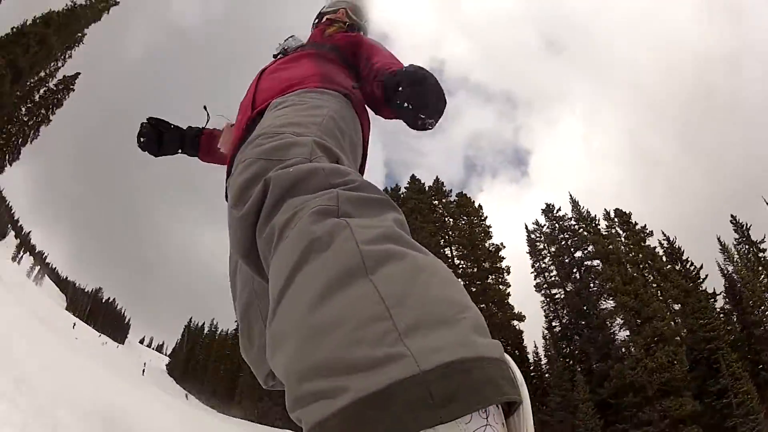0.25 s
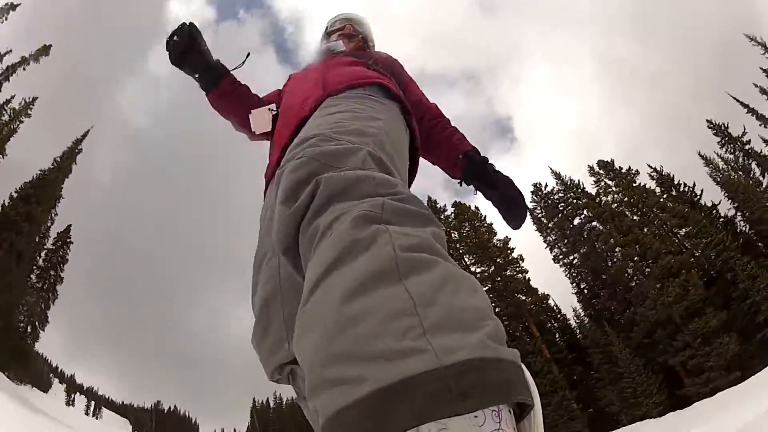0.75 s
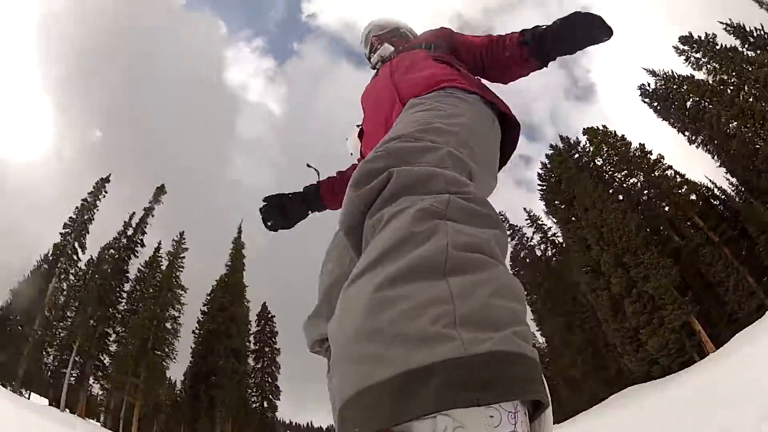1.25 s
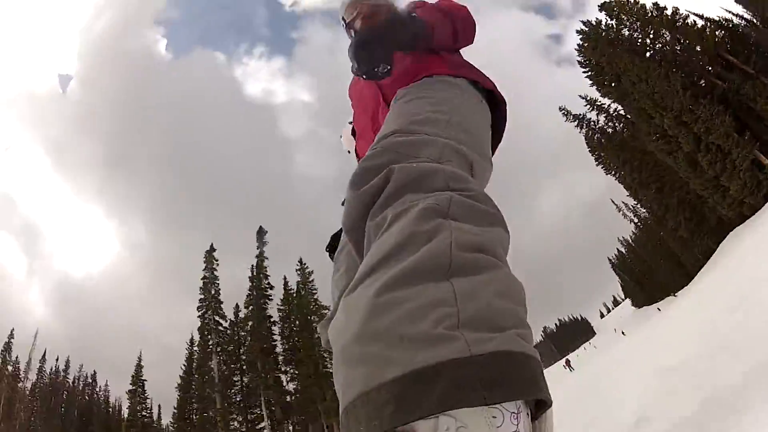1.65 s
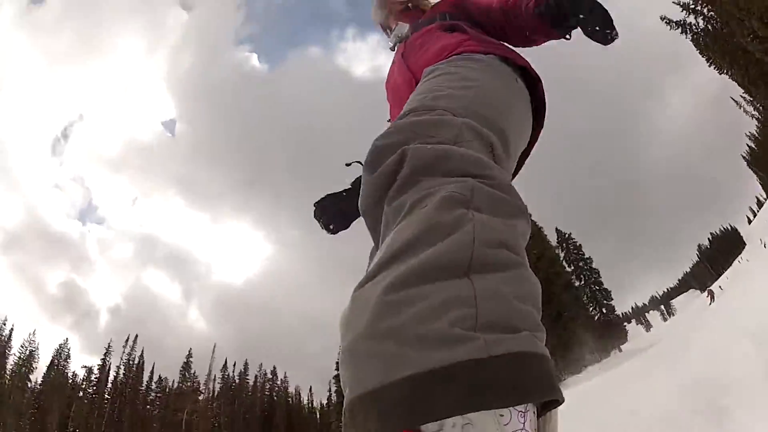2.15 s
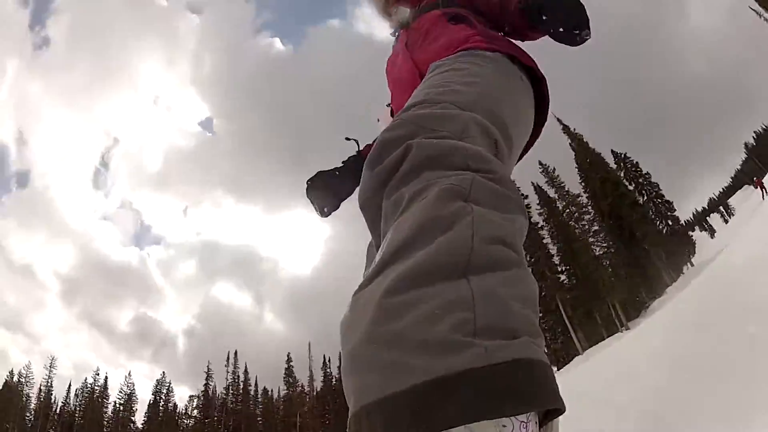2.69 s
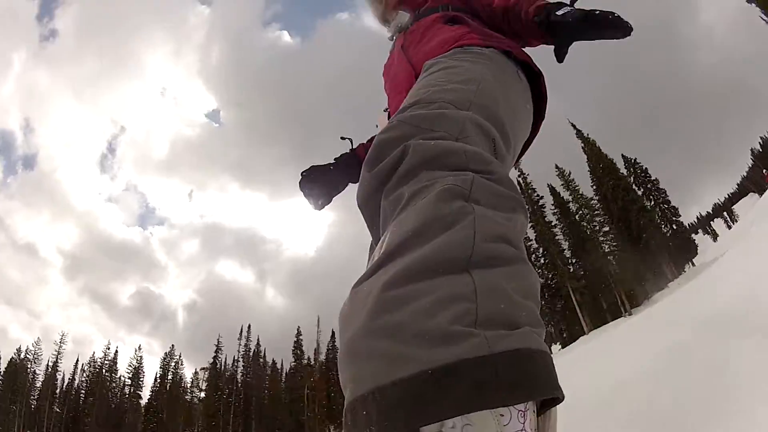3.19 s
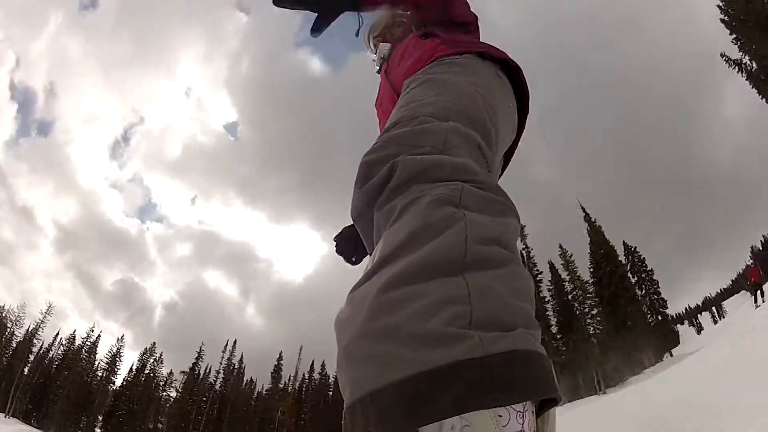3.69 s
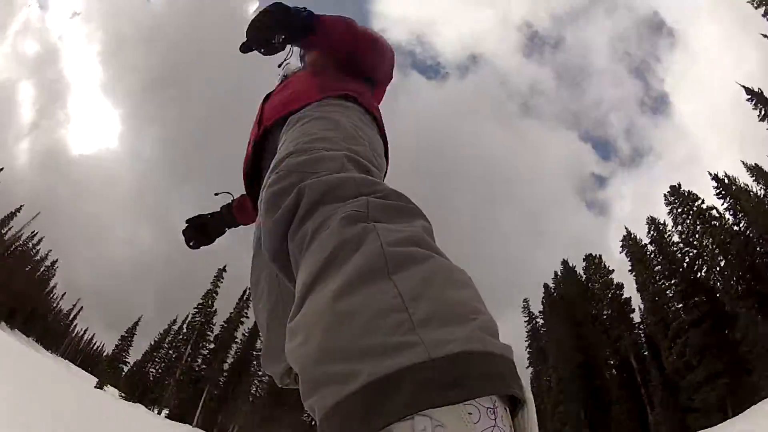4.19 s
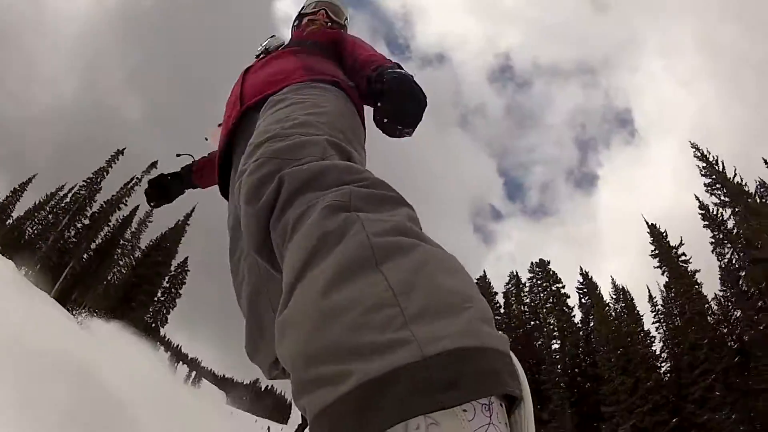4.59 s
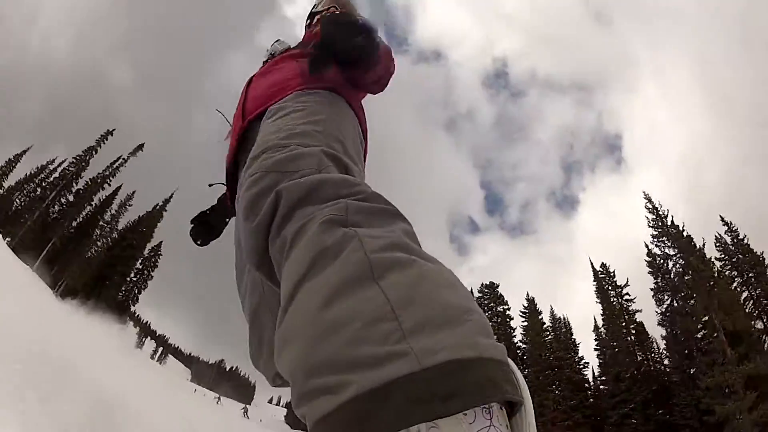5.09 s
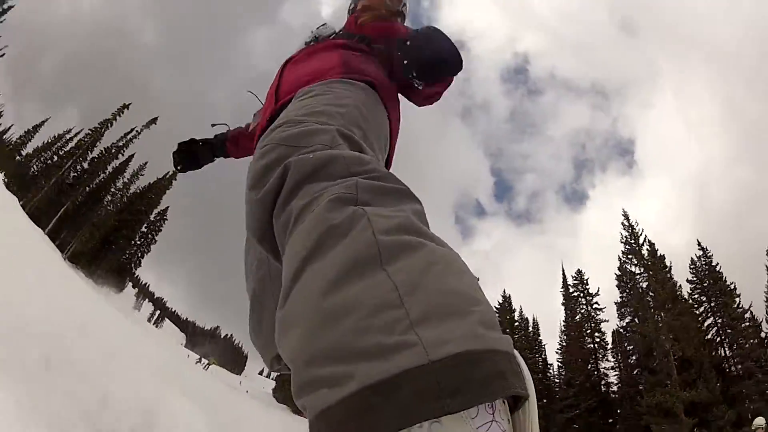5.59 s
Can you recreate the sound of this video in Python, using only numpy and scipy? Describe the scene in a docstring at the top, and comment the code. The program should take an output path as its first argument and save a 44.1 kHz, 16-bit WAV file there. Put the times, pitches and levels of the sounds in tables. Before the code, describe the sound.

A snowboard carves hard snow, heard from a small camera fixed on the deck. A harsh, gritty mid-pitched scrape runs throughout, fluttering in fast surges and dropping for brief moments. Below it the deck shudders in swells. From just before one second, dull thuds and short icy crunches come irregularly. Low wind buffets the housing; the sound is close, dry and slightly clipped.

```python
"""Snowboard carving packed snow

Heard from a small camera in a housing mounted on the deck. Random crystal impacts and hiss, surging
as snow shears, ring the housing and mount: louder as the edge digs in, with brief dips in level.
Noise shudders the board's modes, shaped noise buffets the housing, decaying sines thud as bumps, and
short noisy bursts crunch as ice lumps, with bright ticks. The camera ducks and clips the hardest
blows and holds each sample, which adds a glassy sizzle.
"""
import sys
import numpy as np
from scipy import signal
from scipy.fft import rfft, irfft, next_fast_len
from scipy.io import wavfile
from scipy.ndimage import map_coordinates

SR = 44100
rng = np.random.default_rng(int(sys.argv[2]) if len(sys.argv) > 2 else 0)


def dump(signal):
    """Clip the signal to [-1, 1] and save it as 16-bit WAV at the path in sys.argv[1]."""
    limited = np.clip(np.atleast_2d(signal).T, -1, 1)
    pcm = np.round(limited * 32767).astype(np.int16)
    wavfile.write(sys.argv[1], SR, pcm)


N = 257984

# Levels are relative unless a reference is given; width_hz is the full width at half amplitude.
# rider's pressure on the edge: time_s, level_db
PRESSURE = [(0.0, -17.5), (0.08, -14.5), (0.61, -20.5), (1.07, -18.5), (1.65, -18.5), (2.1, -19.5),
            (2.44, -15.5), (2.8, -18.9), (3.03, -13), (3.16, -19), (3.85, -16.5), (4.08, -19),
            (4.52, -19.5), (4.76, -18.5), (5.06, -21), (5.26, -14.5), (5.53, -21), (5.85, -16.5)]
# edge digs in until the snow gives way: give_s, length_s, rise_db
DIGS = [(0.472, 0.14, 4), (0.759, 0.068, 4.5), (1.057, 0.024, 5), (1.219, 0.025, 4.5), (1.262, 0.011, 8.5),
        (1.456, 0.035, 10), (1.605, 0.031, 5.5), (1.685, 0.065, 4.5), (1.811, 0.089, 4),
        (2.058, 0.028, 6.5), (2.124, 0.075, 4.5), (2.383, 0.027, 8), (3.587, 0.064, 2.5),
        (3.951, 0.095, 4.5), (4.355, 0.015, 7), (4.526, 0.066, 8), (4.571, 0.054, 8), (4.743, 0.022, 6.5),
        (4.928, 0.054, 2), (5.032, 0.023, 3), (5.43, 0.038, 5.5)]
# brief dips in the grinding: start_s, length_s (both at half drop), drop_db (the shortest fall short of it)
DIPS = [(0.517, 0.089, 6.5), (0.934, 0.11, 5), (1.06, 0.1, 5.5), (1.266, 0.017, 2), (1.368, 0.061, 1.5),
        (1.455, 0.047, 8.5), (2.796, 0.032, 4), (2.864, 0.012, 11), (3.17, 0.134, 4), (3.411, 0.061, 3.5),
        (3.599, 0.105, 3.5), (4.029, 0.25, 7.5), (4.366, 0.054, 9), (4.743, 0.097, 8.5), (4.927, 0.081, 9),
        (5.481, 0.11, 6), (5.808, 0.01, 11)]
# fine grit thrown by the tilted edge: time_s, level_db (against the main ring)
GRIT = [(0, -19), (0.85, -14.5), (1.8, -19), (2.4, -17.5), (3.05, -15.5), (3.55, -18), (4.1, -16),
        (4.6, -17), (5.2, -16), (5.85, -18.5)]
# flat base smearing over the snow: time_s, level_db (against the main ring)
SMEAR = [(0, -17), (0.5, -13.5), (1.0, -15.5), (1.5, -11), (2.1, -8), (2.6, -9.5), (3.05, -17.5),
         (3.4, -11.5), (4.1, -14.5), (4.6, -11), (5.85, -12)]
# ground roughness as deck shaking: time_s, level_db
SHAKE = [(0.0, -25), (0.36, -21), (0.75, -12), (1.18, -17), (1.3, -13), (2.13, -9.5), (2.71, -19.0),
         (2.91, -14.4), (3.09, -26.5), (3.33, -12), (3.56, -21.5), (3.94, -10.5), (4.04, -24), (4.31, -8.5),
         (4.56, -17.5), (4.89, -11.5), (5.0, -26), (5.11, -13.5), (5.4, -20), (5.8, -10)]
# wind on the housing: time_s, level_db
GUSTS = [(0, -20.5), (0.2, -38), (0.6, -18.5), (1.05, -19), (1.17, -29), (1.55, -17), (1.8, -30),
         (2.3, -26), (2.6, -40), (2.9, -31), (3.12, -43), (3.33, -26), (3.6, -41), (4.35, -16.5),
         (4.6, -36), (4.8, -25), (5.3, -32.5), (5.78, -19)]
# wind spectrum: pitch_hz, density_db (per Hz)
WIND_SPECTRUM = [(8, -20), (20, -8), (33, -8), (52, -14), (70, -5.5), (150, -16), (400, -45.5), (1500, -66),
                 (4000, -120)]
# bumps striking the board: start_s, level_db, pitch_hz, t60_s
BUMPS = [(0.698, -1.5, 106, 0.16), (0.884, 0.5, 45, 0.17), (0.92, -5, 126, 0.056),
         (1.019, -3.5, 149, 0.095), (1.055, 3.5, 123.6, 0.1), (1.217, -4, 111, 0.027),
         (1.345, -0.5, 153, 0.31), (1.447, 3.5, 124, 0.067), (1.604, 0, 184, 0.071),
         (1.692, -4, 75.4, 0.097), (1.924, 0, 80.6, 0.063), (2.074, 1, 188, 0.026),
         (2.215, -3.5, 147, 0.12), (2.247, 8.5, 148, 0.073), (3.235, -7.5, 148, 0.069),
         (3.351, -1, 61.9, 0.055), (3.382, -1.5, 166, 0.068), (3.886, -0.5, 139, 0.062),
         (3.973, -1.5, 152, 0.02), (4.096, 0, 127, 0.042), (4.152, -7.5, 133, 0.17), (4.261, 0, 67, 0.038),
         (4.296, -5, 138, 0.06), (4.46, -2, 180.3, 0.14), (4.492, -1.5, 78, 0.053),
         (5.399, -3.5, 122, 0.055), (5.645, -6.5, 171.7, 0.12), (5.771, -2, 69.7, 0.13)]
# ice lumps under the edge: start_s, level_db, length_s, tick_db
LUMPS = [(0.898, -3.5, 0.0016, -24), (0.919, -8, 0.0024, -46), (1.039, -2.5, 0.0055, -49),
         (1.053, -4.5, 0.0047, -19), (1.2, -5.5, 0.0035, -45), (1.253, -4, 0.0041, -46),
         (1.45, -3.5, 0.0033, -36), (1.511, -9.5, 0.0048, -48), (1.64, -9, 0.0033, -31),
         (1.692, -16, 0.002, -32), (1.827, -6, 0.0038, -44), (1.986, -4, 0.0013, -39),
         (2.114, -15, 0.0025, -52), (2.341, -5.5, 0.0014, -45), (2.364, -8.5, 0.0026, -50),
         (2.983, -4, 0.0015, -23), (3.095, -6.5, 0.0054, -44), (3.394, -0.5, 0.0015, -19),
         (3.514, -3.5, 0.0041, -41), (3.548, -4, 0.0019, -46), (4.0525, -1.5, 0.0049, -50.5),
         (4.2573, -1.5, 0.0027, -31), (4.353, -5.5, 0.006, -46), (4.503, -5, 0.0033, -54),
         (4.5566, -9, 0.0068, -51), (4.9046, -5, 0.0019, -32), (4.925, 1, 0.0037, -12.5),
         (5.016, -7.5, 0.0057, -55), (5.184, -1, 0.0024, -34), (5.411, -9, 0.0045, -48),
         (5.5816, -7, 0.0029, -53), (5.633, -15, 0.0045, -54), (5.829, -9, 0.0027, -47)]
# main ring of the housing: centre_hz, width_hz, level_db
HOUSING_MODES = [(1513, 236, -13.5), (1654, 170, -13), (1839, 264, -0.5), (2043, 330, 0), (2272, 223, -7.5),
                 (2380, 150, -14.5)]
# upper resonances of the housing: centre_hz, width_hz, level_db
SHELL_MODES = [(3035, 210, -0.5), (3523, 280, 1.5), (3728, 220, 1.5), (3970, 230, -5), (4485, 345, -7),
               (5230, 770, -22)]
# resonances of the mount: centre_hz, width_hz, level_db
MOUNT_MODES = [(340.6, 131, -3), (428.6, 41, -1.5), (595, 310, -13), (819, 120, -7), (941, 84, -2),
               (1030, 115, -6), (1201, 160, -0.5)]
# bending modes of the loaded board: centre_hz, width_hz, level_db
BOARD_MODES = [(75.2, 41.7, 0), (104.2, 23, -4.5), (154.1, 43, -1), (191.8, 52.2, -0.5), (259, 84, -17.5),
               (376, 89, -23.5)]
# colour of the bright tick: centre_hz, width_hz, level_db
TICK_COLOUR = [(4100, 3400, -11.5), (6050, 1400, -4.5)]

FALL_S, RETURN_S = 0.013, 0.017  # full ramps into and out of a dip
DIP_CALMS = 0.4  # share of a dip's drop that also lowers the deck
SHAKE_REST_DB = -12.5  # shaking on ordinary snow
SURGE_DB, SURGE_GROWS = 4.5, 0.61  # quick surge depth on ordinary snow, its exponent on shaking gain
SLAB_DB = 1.5  # slow surge depth
HOLD_HZ, TOP_HZ = 12000, 15400  # camera's sample-hold rate, band limit


def amp(db):
    """Decibels to gain."""
    return 10 ** (np.asarray(db) / 20)


def unit(x):
    """Scale to rms 1."""
    return x / np.sqrt(np.mean(x ** 2) + 1e-20)


def peaked(x, peak_db):
    """Scale to a peak level."""
    return amp(peak_db) * x / np.abs(x).max()


def curve(rows):
    """One value per sample from (time_s, value) rows."""
    return np.interp(np.arange(N) / SR, *np.transpose(rows))


def wobble(rate_hz):
    """Smooth random curve with rate_hz knots a second."""
    knots = rng.standard_normal(int(N * rate_hz / SR) + 4)
    return map_coordinates(knots, [np.arange(N) * rate_hz / SR])


def filtered(x, response):
    """Multiply the spectrum of x by a response of frequency."""
    size = next_fast_len(N + SR // 2)
    gain = response(np.fft.rfftfreq(size, 1 / SR))
    return irfft(rfft(x, size) * gain, size)[:N]


def ringing(modes, size=4096):
    """Minimum-phase impulse response, of energy 1, of a body with steep-sided resonances."""
    hz = np.fft.rfftfreq(size, 1 / SR)
    power = sum((amp(level_db) / (1 + (2 * (hz - centre_hz) / width_hz) ** 2)) ** 2
                for centre_hz, width_hz, level_db in modes)
    # fold the cepstrum to make the response causal
    cepstrum = irfft(np.log(power + 1e-14) / 2)
    cepstrum[1:size // 2] *= 2
    cepstrum[size // 2 + 1:] = 0
    response = irfft(np.exp(rfft(cepstrum)))
    return response / np.linalg.norm(response)


def through(x, body):
    """Play x through a body, at rms 1."""
    return unit(signal.fftconvolve(x, body)[:N])


def add(track, start_s, sound):
    """Mix a sound into the track at start_s."""
    room = track[max(round(start_s * SR), 0):][:len(sound)]
    room += sound[:len(room)]


def grains(rate_hz, spread_db):
    """Tiny impacts at random times with log-normal sizes, at rms 1."""
    struck = rng.random(N) < rate_hz / SR
    sign = np.sign(rng.standard_normal(N))
    return unit(struck * sign * amp(spread_db * rng.standard_normal(N)))


def crystals(rate_hz, spread_db, hiss_db):
    """Snow crystals breaking: countless tiny ones make a hiss, larger ones stand out as grit."""
    return grains(rate_hz, spread_db) + amp(hiss_db) * rng.standard_normal(N)


def shearing(rate_hz, scatter, count=1024):
    """Snow packs under the edge and suddenly shears off: an uneven sawtooth from -1 to 1."""
    breaks_s = np.cumsum(np.exp(scatter * rng.standard_normal(count))) / rate_hz
    load = np.interp(np.arange(N) / SR, np.append(0, breaks_s), np.arange(count + 1)) % 1
    return 2 * load - 1


def digging():
    """Extra load in dB: builds as snow packs ahead of the edge, gone at once when the snow gives."""
    t_s = np.arange(N) / SR
    return sum(rise_db * np.clip((t_s - give_s) / length_s + 1, 0, 1) ** 0.97 * (t_s < give_s)
               for give_s, length_s, rise_db in DIGS)


def dipping():
    """Brief drops of the grinding in dB: quick to fall, a little slower to return."""
    t_s = np.arange(N) / SR
    loss_db = np.zeros(N)
    for start_s, length_s, drop_db in DIPS:
        fall = (t_s - start_s) / FALL_S
        back = (start_s + length_s - t_s) / RETURN_S
        loss_db += drop_db * np.clip(np.minimum(fall, back) + .5, 0, 1)
    return loss_db


def grinding_db():
    """Grinding level in dB: the rider's pressure, with its digs and the dips."""
    return curve(PRESSURE) + digging() - dipping()


def roughness():
    """Deck shaking in dB above that on ordinary snow."""
    return curve(SHAKE) - SHAKE_REST_DB


def edge():
    """The board grinds through the snow in surges and rings the mount and housing."""
    # rough ground deepens the quick surges; larger slabs break off more slowly
    depth_db = SURGE_DB * amp(roughness()) ** SURGE_GROWS
    quick_db = depth_db * shearing(rate_hz=50, scatter=.65)
    slow_db = SLAB_DB * shearing(rate_hz=16, scatter=.7)
    surges = unit(amp(quick_db + slow_db))
    scrape = through(surges * crystals(rate_hz=2200, spread_db=3.0, hiss_db=-1), ringing(HOUSING_MODES))
    grit = through(surges * crystals(rate_hz=1500, spread_db=5.5, hiss_db=2.5), ringing(SHELL_MODES))
    # the flat base follows the surges less
    rub = surges ** 0.75 * amp(2.0 * wobble(35))
    smear = through(rub * crystals(rate_hz=900, spread_db=2.0, hiss_db=0.5), ringing(MOUNT_MODES))
    return amp(grinding_db() - 1.29) * (scrape + amp(curve(GRIT)) * grit + amp(curve(SMEAR)) * smear)


def deck():
    """Uneven snow keeps the board's bending modes shuddering, less so during the dips."""
    ruts = grains(rate_hz=600, spread_db=1.5) + amp(0.5) * rng.standard_normal(N)
    level_db = curve(SHAKE) - DIP_CALMS * dipping() - 2.5
    return amp(level_db) * through(ruts, ringing(BOARD_MODES))


def wind():
    """Low buffeting in gusts: shaped noise with a wandering level."""
    points_hz, density_db = np.transpose(WIND_SPECTRUM)
    air = filtered(rng.standard_normal(N),
                   lambda hz: amp(np.interp(np.log(hz + 1), np.log(points_hz), density_db)))
    return amp(curve(GUSTS) + 2.1 * wobble(11)) * unit(air)


def bumps():
    """Each bump flexes the board for a few cycles, damped by boots and snow, and knocks on the mount."""
    track, t_s = np.zeros(N), np.arange(SR // 5) / SR
    mount = ringing(MOUNT_MODES)
    for start_s, level_db, pitch_hz, t60_s in BUMPS:
        blow = amp(-60 * t_s / t60_s) * (1 - np.exp(-(t_s / 0.0029) ** 2))
        flex = np.sin(2 * np.pi * pitch_hz * t_s) * blow
        knock = signal.fftconvolve(rng.standard_normal(len(t_s)) * blow ** 3, mount)
        add(track, start_s, peaked(flex, level_db - 2.5))
        add(track, start_s, peaked(knock, level_db - 22.5))
    return track


def lumps():
    """An ice lump chatters along the edge for a few milliseconds; a bright tick sounds with it."""
    body = ringing(HOUSING_MODES) + amp(-15.0) * ringing(SHELL_MODES) + amp(-14.5) * ringing(MOUNT_MODES)
    bright = ringing(TICK_COLOUR)
    track, t_s = np.zeros(N), np.arange(SR // 25) / SR
    for start_s, level_db, length_s, tick_db in LUMPS:
        chatter = np.sin(2 * np.pi * rng.normal(1985, 52) * t_s) + 2.76 * rng.standard_normal(len(t_s))
        contact = np.exp(-(2 * t_s / length_s - 1) ** 4)
        crunch = signal.fftconvolve(chatter * contact, body)
        tick = signal.fftconvolve(rng.standard_normal(len(t_s)) * contact, bright)
        add(track, start_s, peaked(crunch, level_db))
        add(track, start_s, peaked(tick, tick_db + 2.0))
    return track


def scene():
    """Sum all sources at one microphone, with no echo on the open slope."""
    return (edge() + deck() + wind() + bumps() + lumps())[None]


def ducked(x, threshold_db, recovery_db_per_s, attack_s):
    """Gain control: peaks over the threshold pull the gain down; it recovers at a steady dB rate."""
    excess_db = np.maximum(20 * np.log10(np.abs(x) + 1e-9) - threshold_db, 0)
    ramp_db = recovery_db_per_s * np.arange(N) / SR
    cut_db = np.maximum.accumulate(excess_db + ramp_db) - ramp_db
    pole = np.exp(-1 / (attack_s * SR))
    return x * amp(-signal.lfilter([1 - pole], [1, -pole], cut_db))


def held(x, count=4):
    """Pick samples at HOLD_HZ and hold each: the spectrum is mirrored around that rate."""
    fine = signal.resample_poly(x, HOLD_HZ * count, SR)
    steps = np.repeat(fine[::count], count)
    return signal.resample_poly(steps, SR, HOLD_HZ * count)[:N]


def record(dry):
    """The camera ducks, holds its samples, clips and keeps nothing above its band limit."""
    level = ducked(dry[0], threshold_db=1.16, recovery_db_per_s=97, attack_s=0.0024)
    clipped = np.clip(held(level), -.97, .97)
    return filtered(clipped, lambda hz: hz < TOP_HZ)[None]


dry = scene()
out = record(dry)
dump(out)
```